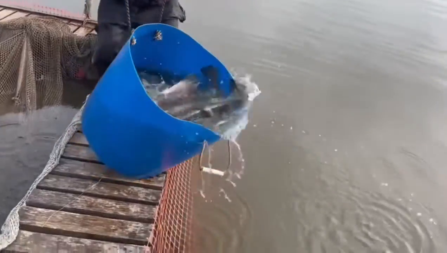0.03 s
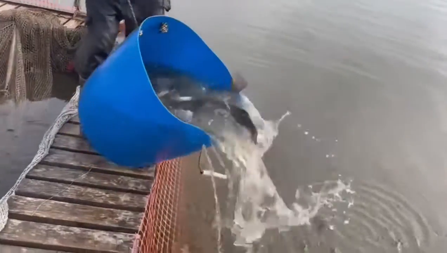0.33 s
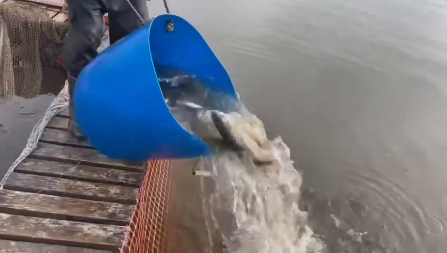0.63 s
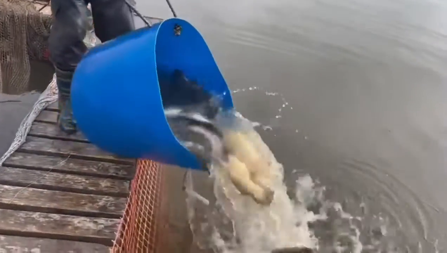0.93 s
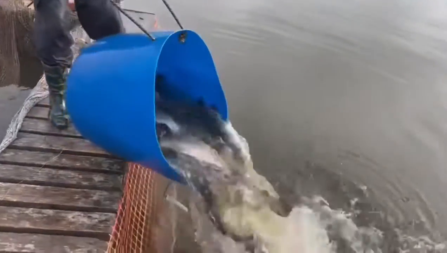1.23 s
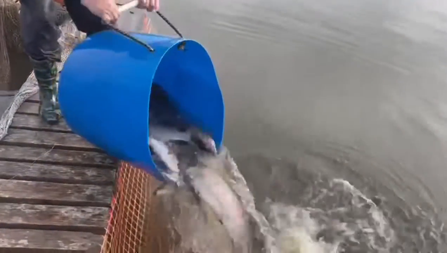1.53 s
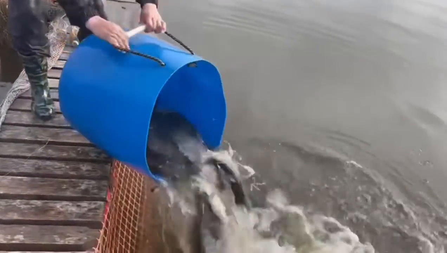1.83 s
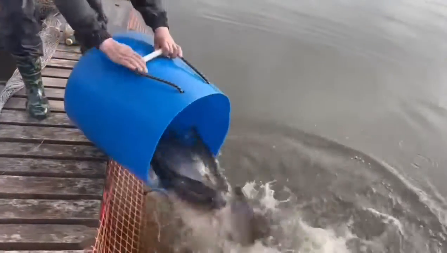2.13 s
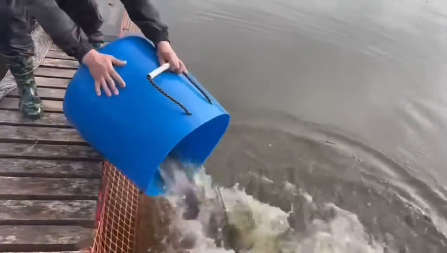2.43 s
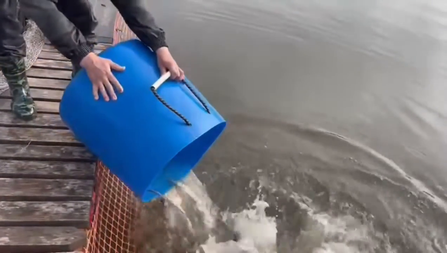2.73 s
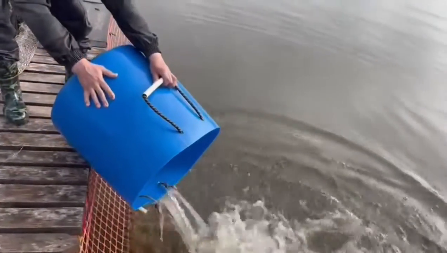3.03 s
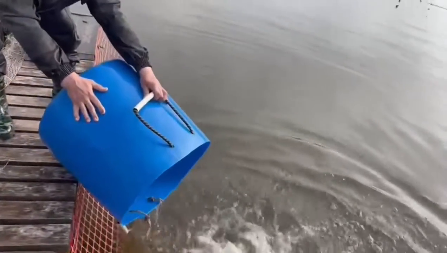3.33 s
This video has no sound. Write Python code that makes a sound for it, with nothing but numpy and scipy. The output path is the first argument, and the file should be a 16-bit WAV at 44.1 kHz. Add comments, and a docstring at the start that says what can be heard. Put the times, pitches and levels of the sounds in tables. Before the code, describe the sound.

Water and live fish pour from a plastic tub, splashing and gurgling into a pond.

```python
"""Water and live fish pour from a plastic tub off a dock into a pond, close to a stereo microphone pair.
A few drips and a plop come first; then the stream lands as spray, churning bubbles and deep gulps of
trapped air. Fish hit the water in separate splashes, dull knocks sound, and the flow thins to a dribble.
The pour sits a little to the left, narrow in the bass; a low outdoor rumble stays behind it."""
import sys
import numpy as np
from scipy import signal
from scipy.fft import rfft, irfft, next_fast_len
from scipy.io import wavfile
from scipy.ndimage import uniform_filter1d, map_coordinates

SR = 44100
rng = np.random.default_rng(int(sys.argv[2]) if len(sys.argv) > 2 else 0)


def wav_record(signal):
    """Record a signal, one row per channel, as 16-bit PCM in the file named by sys.argv[1]."""
    frames = np.transpose(np.atleast_2d(signal))
    bounded = np.clip(frames, -1, 1)
    # unit amplitude maps onto the largest positive 16-bit level
    quanta = np.round(bounded * 32767).astype(np.int16)
    wavfile.write(sys.argv[1], SR, quanta)


N = 158760

# Levels are relative: each layer's trim and the stereo placement act on them afterwards.
# outdoor rumble behind the pour: time_s, level_db
RUMBLE_LEVEL = [(0, -37), (.6, -41.5), (1, -41.5), (2.5, -39.5), (3.05, -35.5), (3.6, -39.5)]
# spectrum of the rumble: frequency_hz, gain_db
RUMBLE_SPECTRUM = [(20, -30), (35, -14), (58, 0), (85, -1.5), (130, -4.5), (250, -11.5), (600, -21.5),
                   (3000, -81)]
# dull knocks, probably the tub shifting on the dock: start_s, level_db, pitch_hz
TUB_KNOCKS = [(.296, -18, 300), (1.054, -22, 75), (1.261, -22, 102), (1.802, -22, 115), (2.824, -21, 67),
              (2.932, -16, 118), (2.982, -19, 79), (3.077, -17.5, 235), (3.253, -17, 360),
              (3.297, -15.5, 256), (3.37, -18, 310), (3.486, -22, 334), (3.547, -25, 342)]
# stray drops on water and planks, and one wet slap: start_s, level_db, centre_hz, fall_s
DROP_TICKS = [(0.028, -43, 4000, .008), (.052, -37.5, 7000, 0.0063), (.1067, -40, 9900, .007),
              (.215, -38, 4960, 0.0075), (.244, -36, 6170, 0.011), (0.309, -29, 6400, 0.0033),
              (0.478, -35, 3420, 0.0058), (1.533, -30, 7600, 0.021)]
# single bubbles that stand out: start_s, level_db, pitch_hz
BUBBLE_PLOPS = [(.023, -28, 935), (.039, -21.5, 2930), (.081, -27, 3450), (.127, -9, 838),
                (.132, -17, 1013), (.148, -26, 3500), (.159, -26.5, 2280), (.165, -26, 2980),
                (.237, -27.5, 2060), (.27, -25, 602), (.314, -28, 1410), (.421, -7.5, 2530),
                (1.051, -9, 720), (1.067, -3, 1980), (1.778, -3, 1065), (2.342, -2.5, 884),
                (2.864, -17, 688), (3.076, -21, 1340), (3.287, -20, 2570), (3.323, -30, 2100)]
# large cavities closing: start_s, level_db, pitch_hz
CAVITY_GULPS = [(1.172, -4, 385), (1.257, -4, 237), (1.335, -1, 317), (1.432, -19, 255), (1.479, -1.5, 214),
                (1.563, -5, 237), (1.595, 2, 251), (1.647, -4.5, 300), (1.66, -5, 278), (1.757, -7, 312),
                (1.797, -4, 270), (2.427, -4, 233), (2.48, -9, 236), (2.771, -13, 337)]
# the stream cuts a bubble's ring short: spray_level_db, share_of_life
RING_LIFE = [(-38, 0.95), (-30, 0.39)]
# fish and slugs of water hitting the pond: start_s, level_db, centre_hz, rise_s, fall_s
FISH_SPLASHES = [(0.298, -29.5, 6700, 0.0052, 0.057), (0.404, -38, 2600, 0.0094, 0.25),
                 (.614, -21, 920, 0.0073, 0.028), (.63, -34, 4480, 0.028, 0.081),
                 (0.97, -23, 4770, 0.013, 0.032), (1.05, -25, 900, 0.002, .015),
                 (1.064, -21, 1780, 0.0041, 0.0076), (1.248, -19.5, 920, 0.017, 0.045),
                 (1.33, -16.5, 875, 0.019, 0.15), (1.53, -20, 3020, 0.0059, 0.033),
                 (1.698, -22.5, 1390, 0.0072, 0.088), (1.759, -31, 970, 0.021, 0.058),
                 (1.935, -25.5, 2200, 0.017, 0.2), (2.066, -21.5, 2230, 0.018, 0.023),
                 (2.203, -18, 1410, 0.017, 0.038), (2.365, -19, 740, 0.011, 0.032),
                 (2.455, -26.5, 2030, 0.011, 0.14), (2.55, -20, 1130, 0.023, 0.042),
                 (2.554, -29, 3600, 0.018, 0.24), (2.703, -21, 730, 0.013, 0.23),
                 (2.863, -27, 900, 0.0023, 0.081), (3.066, -28.5, 1780, 0.0056, 0.038),
                 (3.219, -33, 835, 0.011, 0.04)]
# large air pockets under the stream: time_s, level_db
PLUNGE_LEVEL = [(0, -42), (.58, -44.5), (.65, -34), (1.08, -32.5), (1.2, -24), (1.65, -27), (1.8, -21.5),
                (1.87, -27.5), (1.99, -24.5), (2.27, -32), (2.36, -25.5), (2.55, -28), (2.65, -33),
                (2.92, -30), (3.05, -44), (3.2, -46.5), (3.34, -45.5), (3.6, -51)]
# spectrum of the air pockets: frequency_hz, gain_db
PLUNGE_SPECTRUM = [(60, -37), (120, -10.5), (185, -7), (235, -1), (310, 0), (350, -2.5), (410, 0.5),
                   (520, -7.5), (800, -0.5), (2000, -68)]
# middle-sized bubbles around the stream: time_s, level_db
CHURN_LEVEL = [(0, -50), (.06, -40), (.22, -50.5), (.35, -40.5), (.41, -33), (.59, -33.5), (.65, -26.5),
               (1.8, -26.5), (2.12, -26), (2.28, -28.5), (2.37, -28), (2.6, -26), (2.65, -34),
               (2.75, -30.5), (2.95, -36.5), (3.08, -36), (3.35, -55.5), (3.55, -61), (3.6, -38.5)]
# spectrum of those bubbles: frequency_hz, gain_db
CHURN_SPECTRUM = [(300, 4), (520, -7), (700, 3), (880, 3.5), (980, 0), (1100, 0), (1350, -12), (1700, -33),
                  (3000, -13)]
# spray where the stream lands: time_s, level_db
SPRAY_LEVEL = [(0.0, -56), (0.03, -43), (0.06, -50.5), (0.38, -40.5), (0.42, -25.5), (0.57, -30),
               (0.64, -26.5), (1.79, -26.5), (1.91, -28.5), (1.96, -25), (2.53, -32), (2.58, -27.5),
               (2.65, -31.5), (3.14, -36.5), (3.28, -45), (3.35, -50.5), (3.6, -59)]
# spectrum of the spray: frequency_hz, gain_db
SPRAY_SPECTRUM = [(700, -11.5), (1200, 7.5), (1550, 1.5), (2000, 1), (2200, 1.5), (2450, 4.5), (2800, -2.5),
                  (3050, 0.5), (3300, -4.5), (3650, 0.85), (4500, -5), (5500, -4.5), (7000, -13),
                  (10500, -9.5), (12000, -17)]
# treble within the spray: time_s, gain_db
SPRAY_TREBLE = [(0, 5), (.45, 2), (1.5, 0.5), (2.2, -2), (2.9, -3), (3.2, -2.5), (3.6, 10.5)]
# two spectral dips that glide upward as the stream thins: first_hz, last_hz
HOLLOW_GLIDES = [(1640, 1930), (4580, 4870)]
# treble notch in the centre of the image; the sides stay bright there: frequency_hz, gain_db
MID_NOTCH = [(6900, 0), (7300, -6), (7650, -27), (8700, -27), (9100, -6), (9500, 0)]
# side signal of the microphone pair: frequency_hz, gain_db
SIDE_GAIN = [(60, -28), (560, -17.5), (700, -7.5), (1270, -26), (1480, 0), (1770, -8.5), (2100, -3.5),
             (2450, -9), (2750, -1.5), (3450, -5), (4200, -33), (5000, -7.5), (6100, -18), (7000, -4),
             (9500, 4), (10600, -56)]
# left microphone's level over the right: frequency_hz, difference_db
LEFT_LEVEL = [(200, -0.3), (450, 0.2), (700, -1.5), (950, 3.5), (1250, 3), (1550, 3.5), (1850, 3.5),
              (2150, 5), (2450, 0), (2800, 3), (3050, 6.5), (3300, 3), (3700, 0)]
# left microphone's lead over the right: frequency_hz, phase_rad
LEFT_PHASE = [(60, 0.17), (220, 0.18), (530, 0.12), (700, 0.36), (880, 0.89), (1150, 0.66), (1450, 0.49),
              (1650, 0)]

PLOP_CYCLES, GULP_CYCLES, KNOCK_CYCLES = 48.5, 21, 5.2  # cycles to fade by 60 dB
PLOP_TRIM_DB, GULP_TRIM_DB, KNOCK_TRIM_DB, SPLASH_TRIM_DB = -3, -1.5, 9, -2.5
SPRAY_TRIM_DB, CHURN_TRIM_DB, PLUNGE_TRIM_DB, TRICKLE_TRIM_DB = -0.75, -1, 0.5, -19.5


def amp(db):
    """Decibels to gain."""
    return 10 ** (np.asarray(db) / 20)


def unit(x):
    """Scale to rms 1."""
    return x / np.sqrt(np.mean(x ** 2) + 1e-20)


def along(points, hz):
    """Read (frequency_hz, value) points on a log axis."""
    frequencies, values = np.transpose(points)
    return np.interp(np.log(hz + 1), np.log(frequencies + 1), values)


def curve(rows):
    """Read (time_s, value) rows at every sample."""
    return np.interp(np.arange(N) / SR, *np.transpose(rows))


def wobble(rate_hz):
    """A smooth random curve with rate_hz knots a second."""
    return map_coordinates(rng.standard_normal(2048), [np.arange(N) * rate_hz / SR], mode="wrap")


def filtered(x, response):
    """Multiply the spectrum of x by a function of frequency."""
    length = x.shape[-1]
    padded = next_fast_len(length + 8192)
    return irfft(rfft(x, padded) * response(np.fft.rfftfreq(padded, 1 / SR)), padded)[..., :length]


def coloured(x, spectrum):
    """Filter x by (frequency_hz, gain_db) points."""
    return filtered(x, lambda hz: amp(along(spectrum, hz)))


def add(track, start_s, sound):
    """Mix a sound into a track."""
    part = track[..., max(0, round(start_s * SR)):][..., :sound.shape[-1]]
    part += sound[..., :part.shape[-1]]


def bubble(t, hz, cycles, pitch_rise=0.054):
    """A ringing air bubble: soft start, slightly rising pitch, a 60 dB fade over the given cycles."""
    age = t * hz / cycles
    phase = 2 * np.pi * hz * t * (1 + pitch_rise * np.minimum(age, 2) / 2)
    onset = 1 - np.exp(-(t * hz) ** 2)
    return np.sin(phase) * amp(-60 * age) * onset


def swarm(low_hz, high_hz, cycles, spread_db, count, ring_samples):
    """Bubbles of random time, pitch and strength, each at its own place: mid and side."""
    when, pitch, strength, place = rng.random((4, count))
    hz = low_hz * (high_hz / low_hz) ** pitch
    gain = hz * amp(spread_db * np.minimum(-np.log(1 - strength), 3))
    rings = gain[:, None] * bubble(np.arange(ring_samples) / SR, hz[:, None], cycles)
    samples = ((when * N).astype(int)[:, None] + np.arange(ring_samples)).ravel()
    pan = (2 * place - 1)[:, None]
    return np.array([unit(np.bincount(samples, part.ravel(), N)[:N]) for part in (rings, rings * pan)])


def water(bubbles, spectrum, wash_db):
    """Bubbles on a wash of noise, coloured, at rms 1."""
    wash = amp(wash_db) * rng.standard_normal((2, N))
    return unit(coloured(bubbles + wash, spectrum))


def burst(centre_hz, rise_s, fall_s):
    """Spray around one pitch that swells, then fades by 30 dB every fall_s: mid and side."""
    t = np.arange(SR // 4) / SR
    noise = rng.standard_normal((2, len(t)))
    band = filtered(noise, lambda hz: 1 / (1 + np.log2((hz + 1) / centre_hz) ** 2) ** 1.14)
    return unit(band) * np.minimum(t / rise_s, 1) * amp(-30 * np.maximum(t - rise_s, 0) / fall_s)


def rumble():
    """Low, uneven outdoor rumble around the pond."""
    noise = unit(coloured(rng.standard_normal((2, N)), RUMBLE_SPECTRUM))
    return noise * amp(curve(RUMBLE_LEVEL) + 1.5 * wobble(16))


def dock_echo(x, level_db=-9, t60_s=0.06):
    """Short scattered reflections from the dock and the tub: mid and side."""
    t = np.arange(SR // 5) / SR
    tail = rng.standard_normal((2, len(t))) * amp(-60 * t / t60_s) * (t > .003)
    tail /= np.linalg.norm(tail[0])
    return amp(level_db) * signal.fftconvolve(x[None], tail, axes=1)[:, :N]


def knocks():
    """Heavily damped low thuds on the dock, over in a few cycles."""
    out, t = np.zeros(N), np.arange(SR // 8) / SR
    for start_s, level_db, hz in TUB_KNOCKS:
        onset = 1 - np.exp(-(t * hz) ** 2)
        fade = amp(level_db + KNOCK_TRIM_DB - 60 * t * hz / KNOCK_CYCLES)
        add(out, start_s, onset * fade * np.sin(2 * np.pi * hz * t))
    return out


def ticks():
    """Drops and a slap close to the microphones snap with almost no rise."""
    out = np.zeros(N)
    for start_s, level_db, centre_hz, fall_s in DROP_TICKS:
        snap = burst(centre_hz, rise_s=.0004, fall_s=fall_s)[0]
        add(out, start_s, amp(level_db) * snap)
    return out


def trickle(db_per_spray_db=0.67):
    """Sparse drops ring out of the spray, most clearly when the flow is thin."""
    drops = swarm(1100, 5000, cycles=58, spread_db=2.2, count=480, ring_samples=1800)
    level_db = TRICKLE_TRIM_DB + db_per_spray_db * curve(SPRAY_LEVEL)
    tail_off = curve([(3.3, 0.85), (3.36, 0.18)])
    return unit(coloured(drops, SPRAY_SPECTRUM)) * amp(level_db) * tail_off


def single_bubbles(rows, cycles, trim_db):
    """Bubbles that stand out one by one: they ring in calm water and die fast under the stream."""
    out, t = np.zeros(N), np.arange(SR // 8) / SR
    for start_s, level_db, hz in rows:
        spray_db = np.interp(start_s, *np.transpose(SPRAY_LEVEL))
        life_share = np.interp(spray_db, *np.transpose(RING_LIFE))
        add(out, start_s, amp(level_db + trim_db) * bubble(t, hz, cycles * life_share))
    return out


def splashes():
    """Each fish or slug of water throws up a burst of spray as it hits the pond."""
    out = np.zeros((2, N))
    for start_s, level_db, centre_hz, rise_s, fall_s in FISH_SPLASHES:
        add(out, start_s, amp(level_db + SPLASH_TRIM_DB) * burst(centre_hz, rise_s, fall_s))
    return out


def plunge(split_hz=340, gentle_db=-31, small_share=0.59):
    """Air dragged under by the stream gurgles; a harder plunge traps larger, deeper pockets."""
    pockets = swarm(150, 560, cycles=6, spread_db=0.6, count=2600, ring_samples=1800)
    gurgle = water(pockets, PLUNGE_SPECTRUM, wash_db=0.5)
    large = filtered(gurgle, lambda hz: 1 / (1 + (hz / split_hz) ** 10))
    level_db = curve(PLUNGE_LEVEL)
    # small pockets gain only a share of each dB past the gentle level
    small = (gurgle - large) * amp((small_share - 1) * np.maximum(level_db - gentle_db, 0))
    return (large + small) * amp(level_db + PLUNGE_TRIM_DB + wobble(34.96))


def churn():
    """Middle-sized bubbles boil around the stream."""
    bubbles = swarm(500, 1785, cycles=17, spread_db=0.9, count=2600, ring_samples=1500)
    boil = water(bubbles, CHURN_SPECTRUM, wash_db=4)
    return boil * amp(curve(CHURN_LEVEL) + CHURN_TRIM_DB + 1.2 * wobble(90))


def spray(treble_hz=5000):
    """Droplets and tiny bubbles fizz where the stream lands, brightest at the start and the end."""
    drops = swarm(1306.4, 11100, cycles=67, spread_db=1.0, count=8000, ring_samples=640)
    hiss = water(drops, SPRAY_SPECTRUM, wash_db=6.0)
    treble = filtered(hiss, lambda hz: 1 - 1 / (1 + (hz / treble_hz) ** 4))
    fizz = hiss - treble + treble * amp(curve(SPRAY_TREBLE))
    return fizz * amp(curve(SPRAY_LEVEL) + SPRAY_TRIM_DB + 1.3 * wobble(70))


def moving_stream(x, patchy_db=1.7, runoff_s=(2.34, 3.5), hollow_db=-6, hollow_width_hz=140):
    """The water's colour shifts in patches as the stream moves, and turns hollow as it thins."""
    hz, t, spectra = signal.stft(x, SR, nperseg=1024)
    patches = rng.standard_normal(spectra.shape[1:])
    for _ in range(2):
        patches = uniform_filter1d(patches, size=3, axis=0)  # across frequency
        patches = uniform_filter1d(patches, size=14, axis=1)  # across time
    gain_db = patchy_db * unit(patches)
    thinning = np.interp(t, runoff_s, (0, 1))
    for first_hz, last_hz in HOLLOW_GLIDES:
        centre_hz = first_hz + (last_hz - first_hz) * thinning
        dip = np.exp(-((hz[:, None] - centre_hz) / hollow_width_hz) ** 2)
        gain_db += hollow_db * np.sqrt(thinning) * dip
    return signal.istft(spectra * amp(gain_db), SR, nperseg=1024)[1][:, :N]


def scene():
    """The pour at the microphone pair: narrow in the bass, wider and a little to the left above it."""
    rings = single_bubbles(BUBBLE_PLOPS, PLOP_CYCLES, PLOP_TRIM_DB)
    rings += single_bubbles(CAVITY_GULPS, GULP_CYCLES, GULP_TRIM_DB)
    surface = moving_stream(spray() + trickle() + churn() + splashes())
    mid, side = surface + plunge() + rumble() + dock_echo(rings)
    mid = coloured(mid + rings + knocks(), MID_NOTCH) + ticks()
    side = coloured(side, SIDE_GAIN)
    half = np.array([[.5], [-.5]])  # left and right each take half the level and phase difference
    placed = filtered(
        mid, lambda hz: amp(half * along(LEFT_LEVEL, hz)) * np.exp(1j * half * along(LEFT_PHASE, hz)))
    return placed + np.array([side, -side])


def record(dry, low_cut_hz=28.4, top_hz=11900):
    """The deepest bass rolls off and nothing is kept above the band limit."""
    return filtered(dry, lambda hz: (1 - 1 / (1 + (hz / low_cut_hz) ** 4)) * (hz < top_hz))


dry = scene()
out = record(dry)
wav_record(out)
```